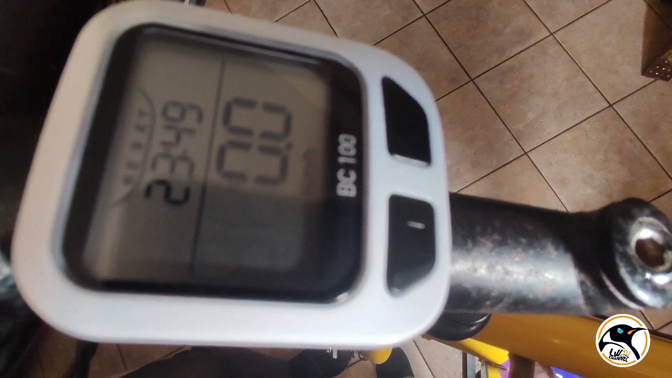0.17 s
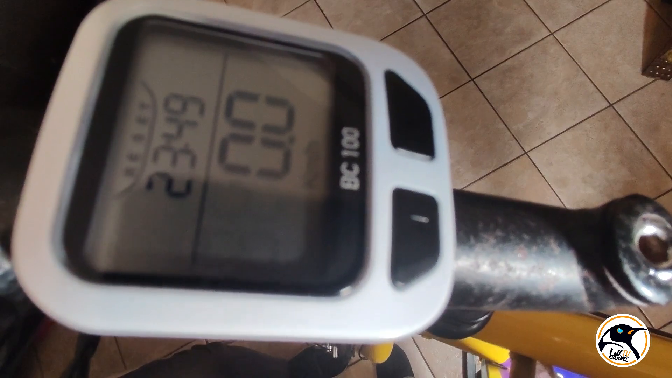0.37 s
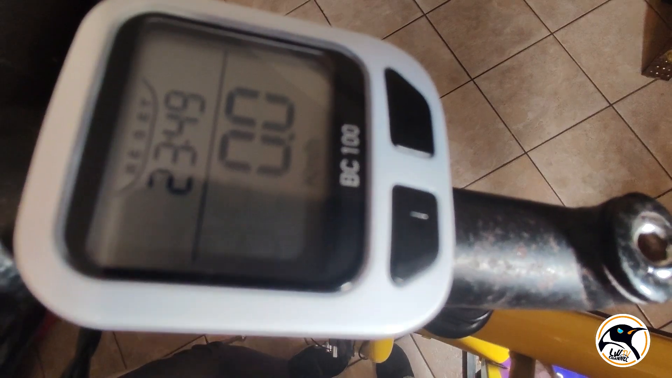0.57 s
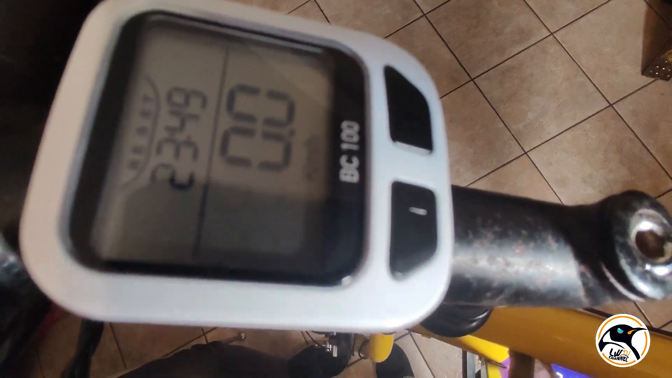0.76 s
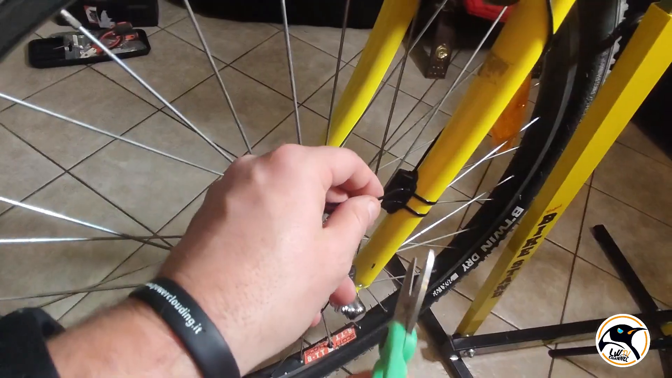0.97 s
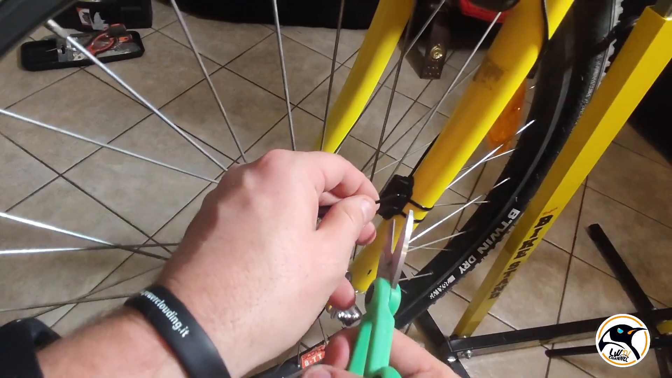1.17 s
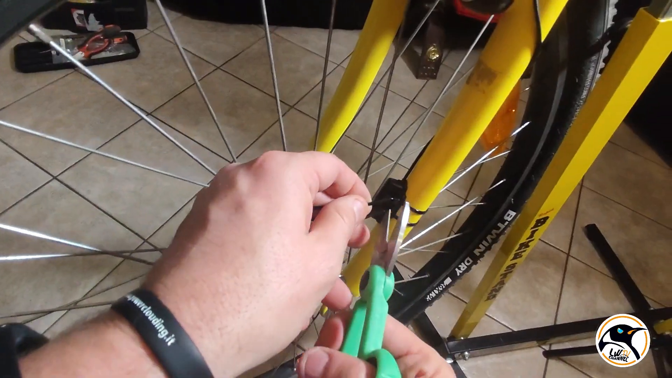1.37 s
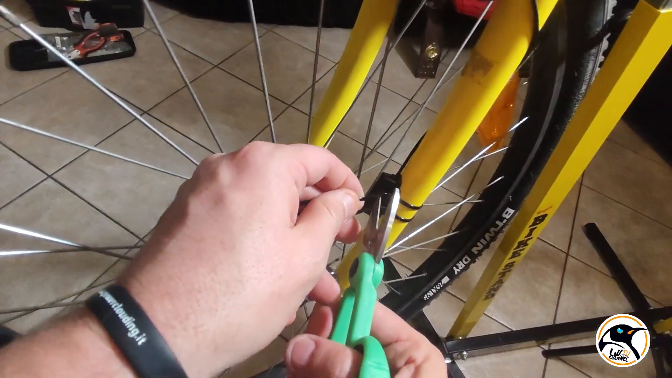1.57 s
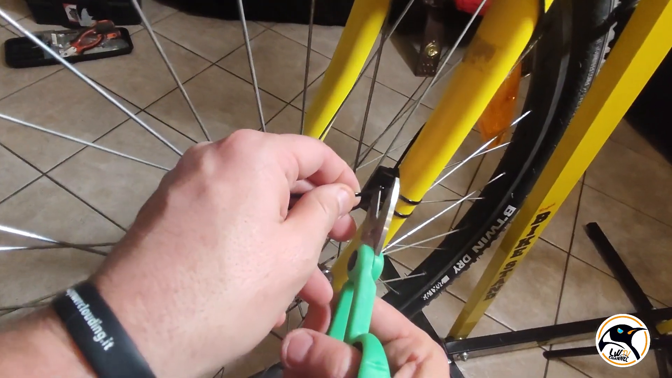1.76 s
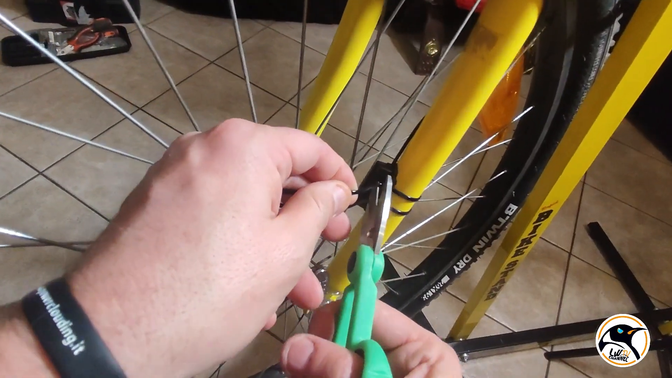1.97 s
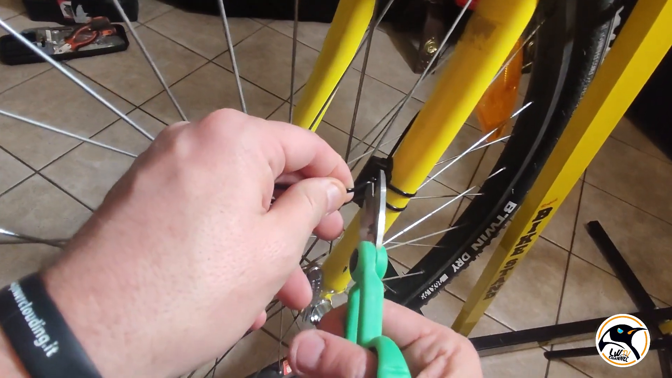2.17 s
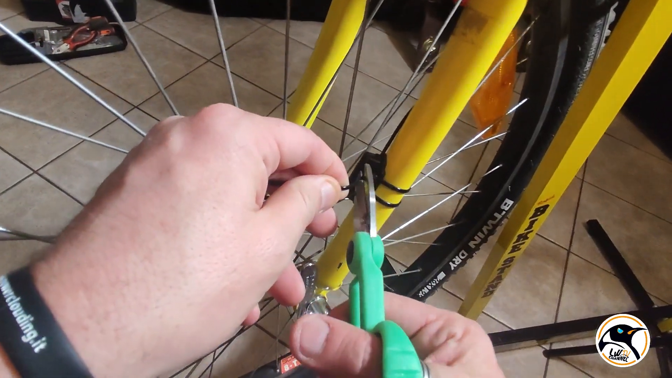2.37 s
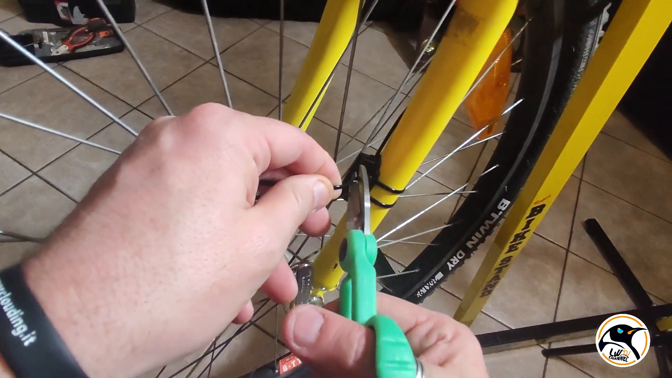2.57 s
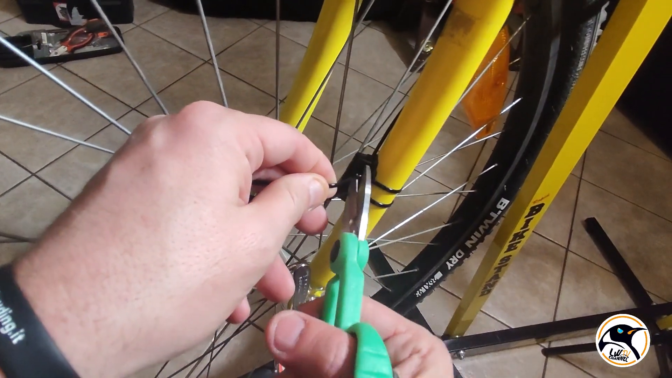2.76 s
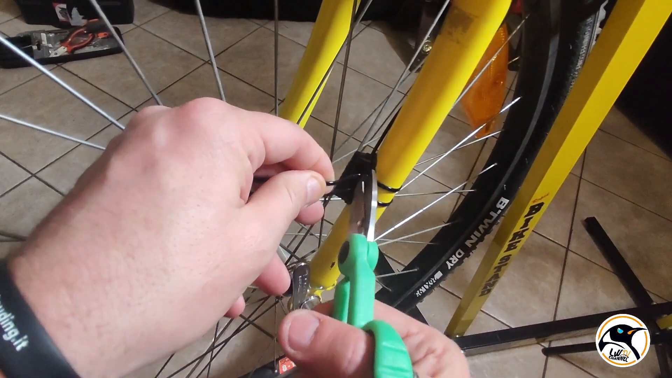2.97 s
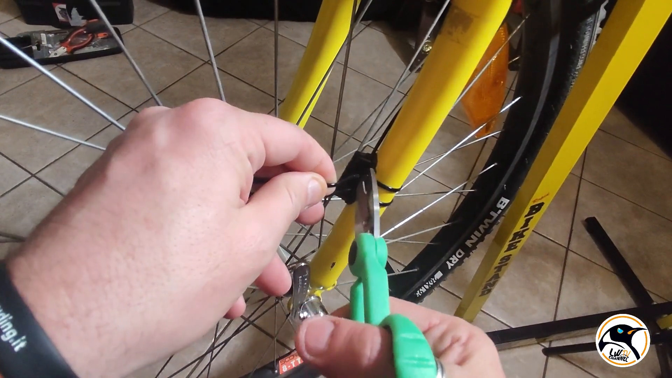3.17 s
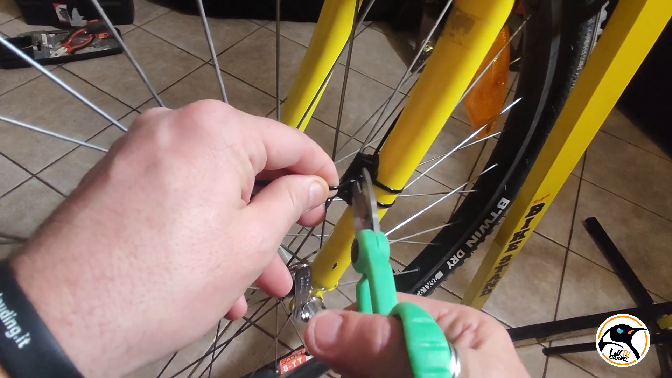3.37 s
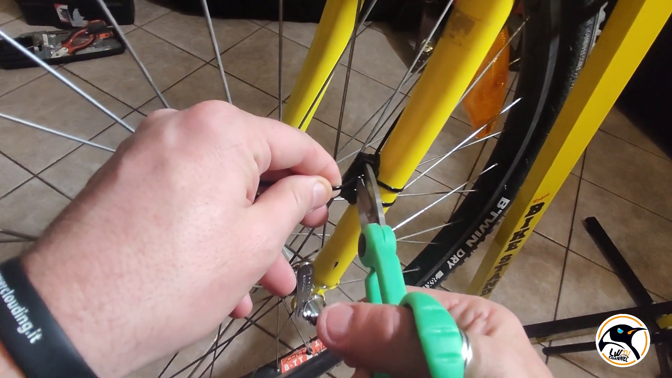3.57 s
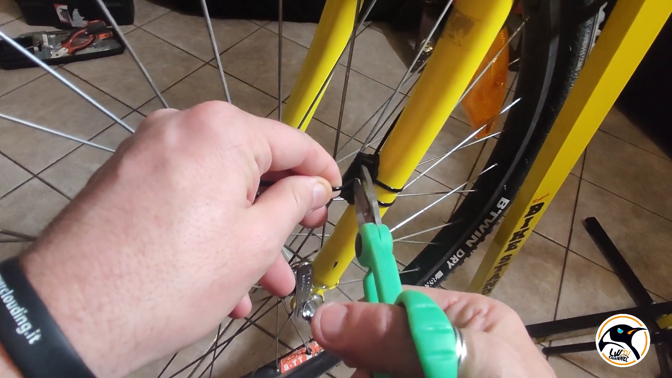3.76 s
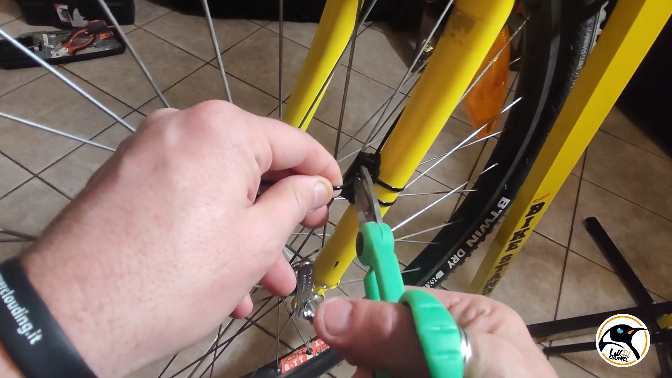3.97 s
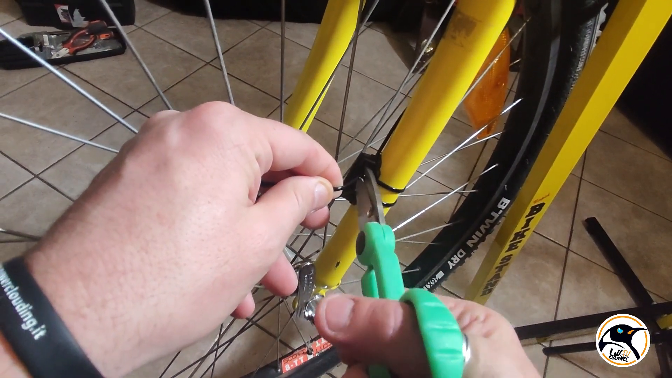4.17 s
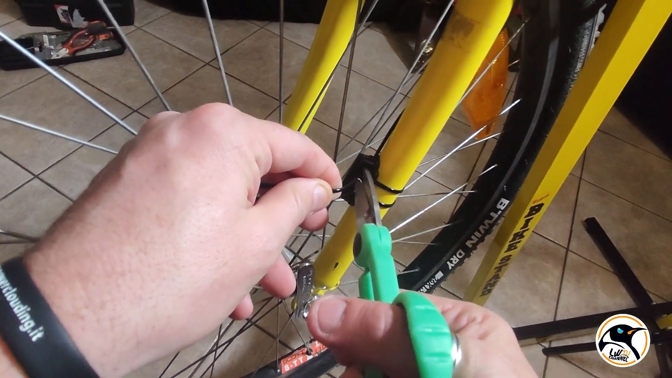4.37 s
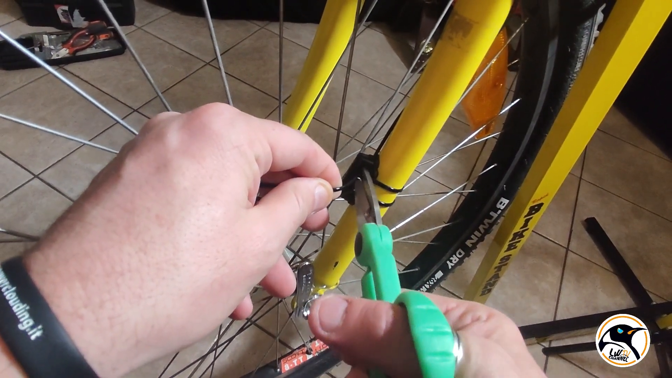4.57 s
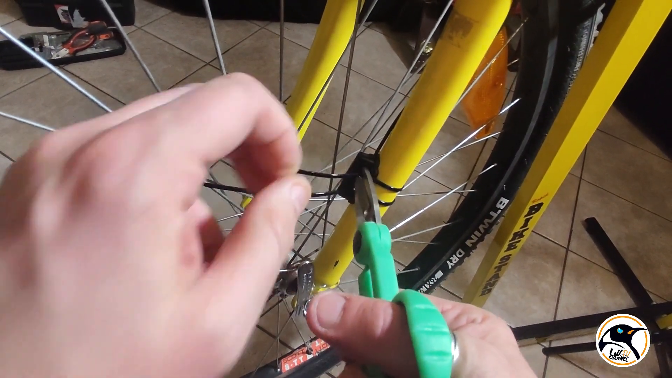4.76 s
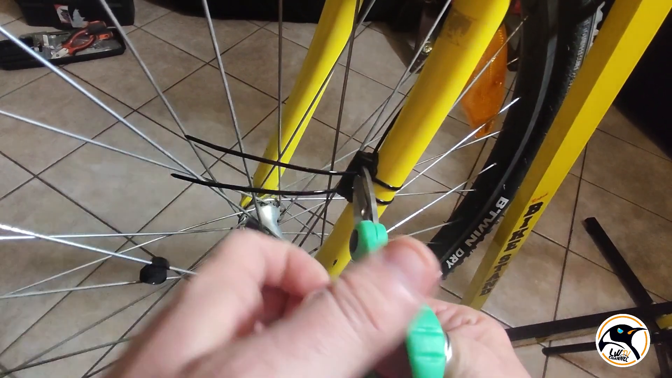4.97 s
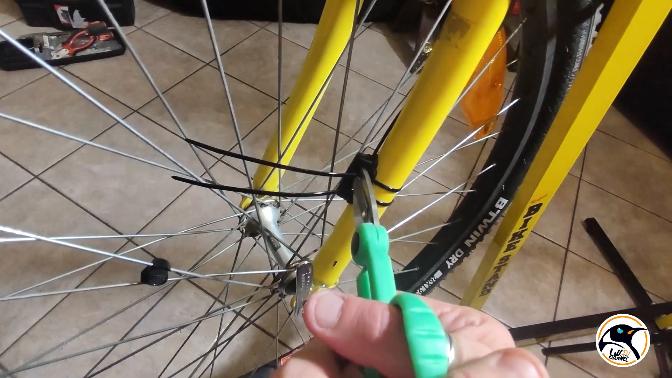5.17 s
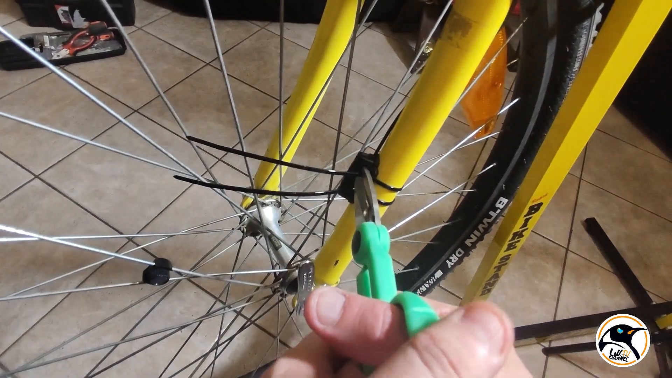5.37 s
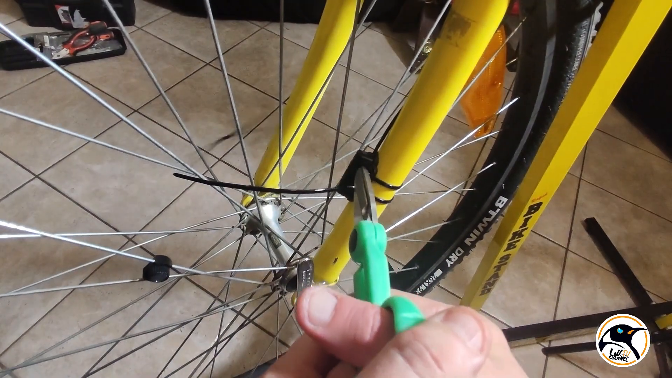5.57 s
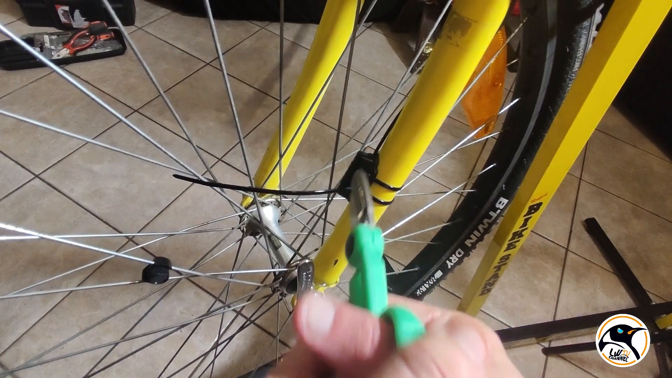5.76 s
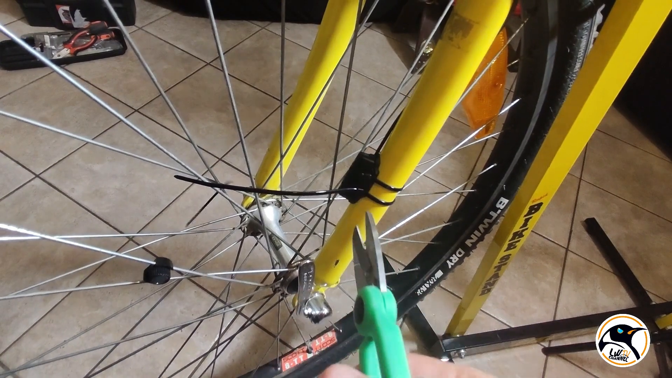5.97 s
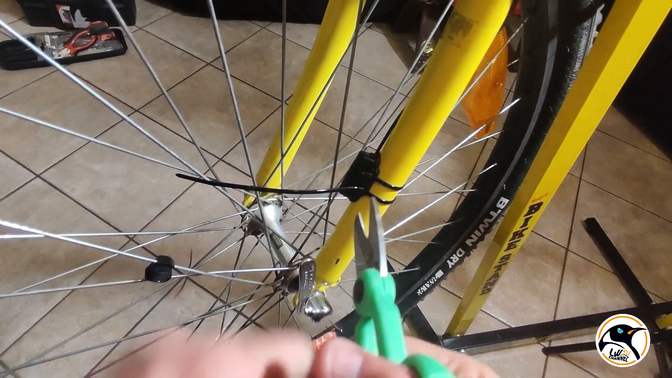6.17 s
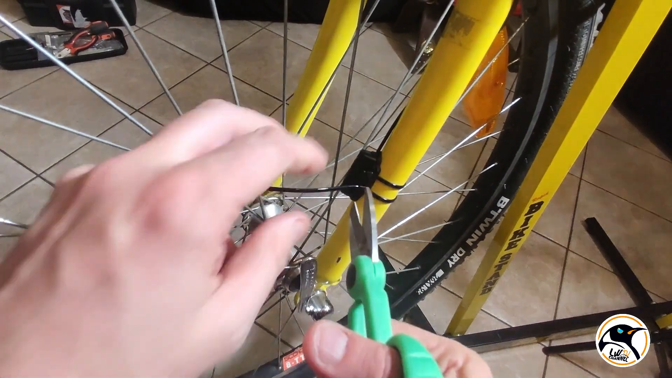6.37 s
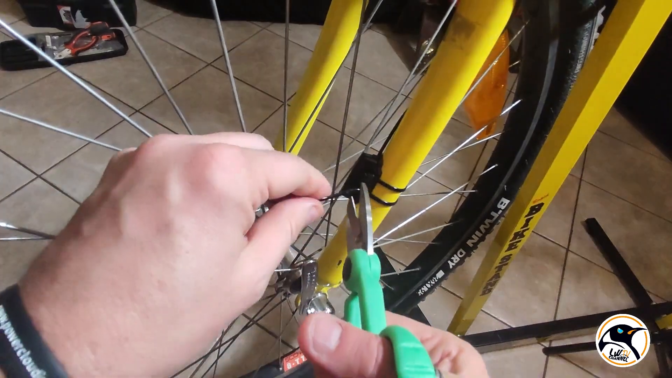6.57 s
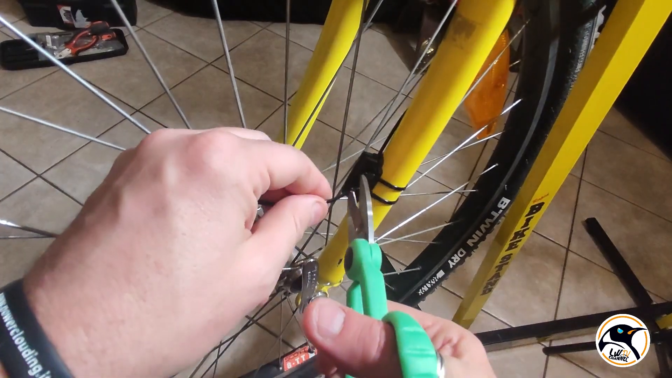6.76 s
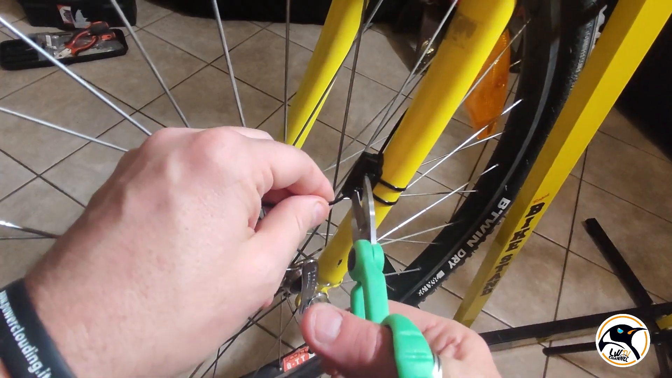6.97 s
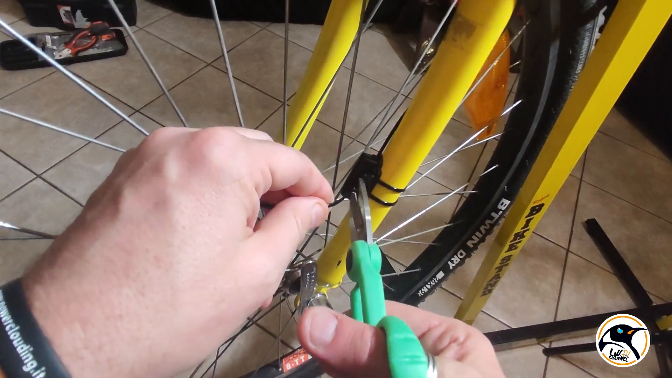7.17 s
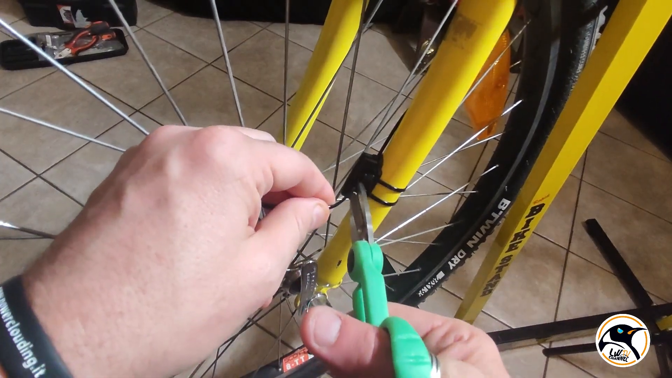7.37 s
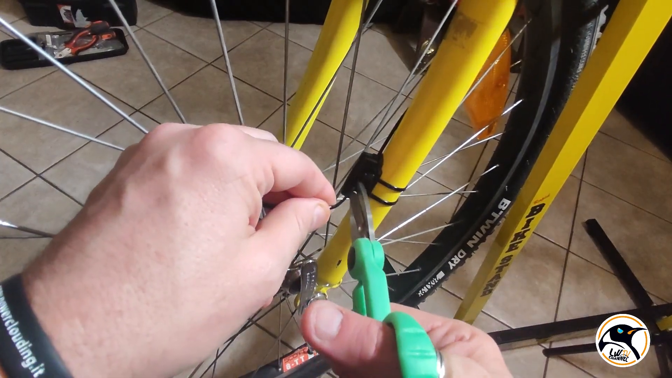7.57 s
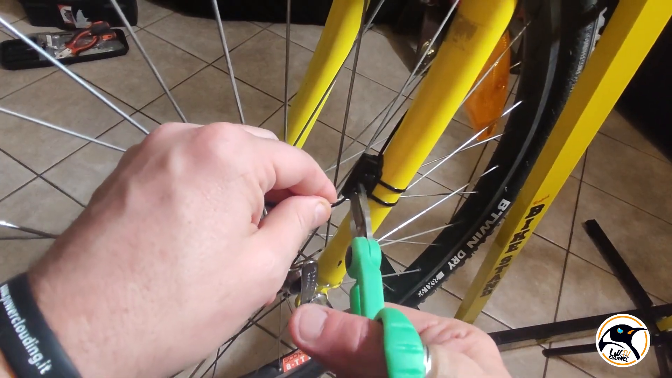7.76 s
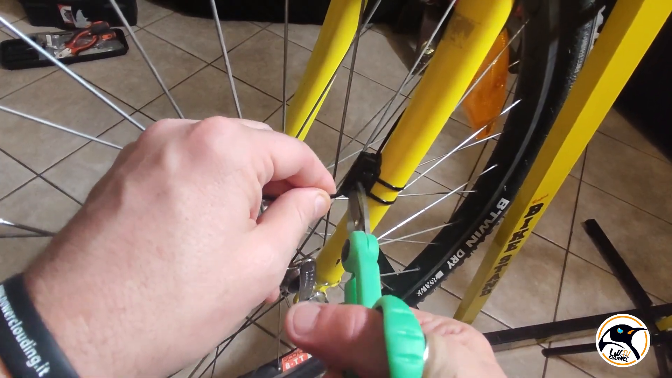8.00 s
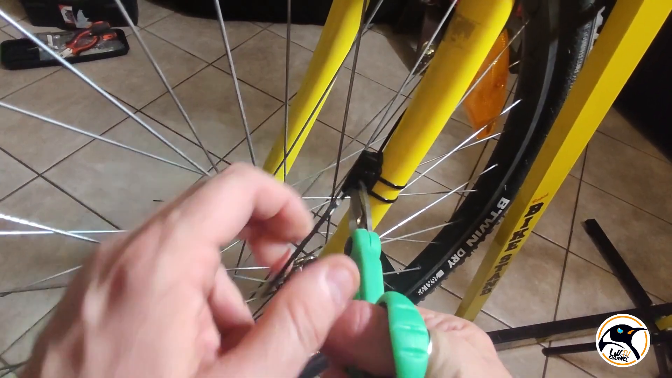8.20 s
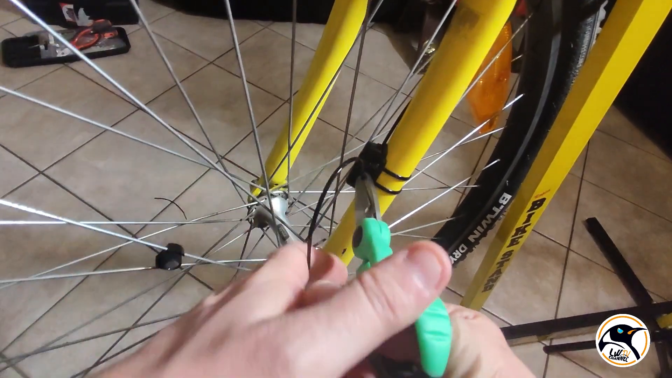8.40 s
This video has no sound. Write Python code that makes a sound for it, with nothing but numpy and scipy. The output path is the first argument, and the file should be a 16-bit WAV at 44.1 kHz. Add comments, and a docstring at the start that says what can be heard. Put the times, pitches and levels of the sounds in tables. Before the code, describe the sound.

In a small tiled room, a close handheld stereo microphone catches a dull tap and a soft hollow knock on a bicycle, quickly damped by a hand. Faint ticks, muted taps and skin rubs follow over hiss and low rumble. Late on, one very sharp plastic snap cracks out, then the cutter jaws clatter open with a thin ringing ping. Sparse ticks and slides continue to a final crisp click.

```python
"""Zip-tie tails are trimmed from a bicycle fork in a tiled room: filtered clicks, noise bursts and modes.
A dull tap, then a soft knock rings the bicycle until a hand damps it; the microphone is nudged once.
Jaws tick and tap, a faint hum swells twice, one sharp snap, and the jaws spring open ringing.
More ticks and taps follow. Sliding noise near a two-port microphone recurs throughout,
over filtered-noise hiss, handling rumble and the hum."""
import sys
import numpy as np
from scipy import signal
from scipy.fft import rfft, irfft
from scipy.io import wavfile

SR = 44100
rng = np.random.default_rng(int(sys.argv[2]) if len(sys.argv) > 2 else 0)


def persist_wave(psi):
    """Save psi, clipped to +-1, as 16-bit WAV."""
    counts = np.round(np.clip(psi, -1, 1) * 32767).astype(np.int16)
    wavfile.write(sys.argv[1], SR, np.atleast_2d(counts).T)


N = 371939
TIME = np.arange(N) / SR


def from_db(db):
    """Decibels to gain."""
    return 10 ** (np.asarray(db) / 20)


def rms_one(x):
    """Scale to rms 1."""
    return x / np.sqrt(np.mean(x ** 2) + 1e-20)


def at_hz(points, hz):
    """Interpolate a table on a log-frequency axis."""
    points = np.array(points)
    return np.interp(np.log(np.maximum(hz, 1)), np.log(points[:, 0]), points[:, 1])


def response(spectrum, size=8192):
    """Causal minimum-phase impulse response of a spectrum, by folding its cepstrum."""
    bin_hz = np.arange(size // 2 + 1) * SR / size
    cepstrum = irfft(np.log(from_db(at_hz(spectrum, bin_hz))))
    cepstrum[1:size // 2] *= 2
    cepstrum[size // 2 + 1:] = 0
    return irfft(np.exp(rfft(cepstrum)))


def colour(x, spectrum):
    """Filter by a spectrum; white noise keeps its power."""
    h = response(spectrum)
    unit_energy = h[None] / np.linalg.norm(h)
    return signal.oaconvolve(np.atleast_2d(x), unit_energy, axes=1)[:, :N]


def soften(x, top_hz):
    """A softer contact carries less above top_hz: fourth-order lowpass."""
    lowpass = signal.butter(4, min(top_hz, .45 * SR), fs=SR, output="sos")
    return signal.sosfilt(lowpass, np.asarray(x) + 1e-18)


def clicks(rows):
    """One impulse for each row (time [s], level [dB])."""
    out = np.zeros(N)
    for s, db in rows:
        out[round(s * SR)] += from_db(db)
    return out


def burst(s, dying_s):
    """A contact: micro-slips of random sign start at once and decay by 1/e in dying_s."""
    out, age = np.zeros(N), TIME[:SR // 2]
    start = round(s * SR)
    fade = np.exp(-age / max(dying_s, 1e-4))
    slips = (rng.choice([-1, 1], len(age)) * fade)[:N - start]
    out[start:][:len(slips)] = slips
    return out


def ring(x, hz, t60):
    """Two-pole resonator: a unit click starts a decaying sine of height 1; t60 in seconds."""
    radius, angle = from_db(-60 / (t60 * SR)), 2 * np.pi * hz / SR
    poles = [1, -2 * radius * np.cos(angle), radius * radius]
    return signal.lfilter([0, np.sin(angle)], poles, x + 1e-18)


def swells(rows):
    """Gain over time: a bell for each (time [s], level [dB], half length to 1/e power [s])."""
    power = 0
    for s, db, half_s in rows:
        power = power + from_db(db) ** 2 * np.exp(-np.minimum(((TIME - s) / half_s) ** 2, 50))
    return np.sqrt(power)


def friction(strokes, spectrum, grain_db):
    """Each stroke is a swell of tiny slips, uneven in size from one 32-sample grain to the next."""
    grains = np.repeat(rng.standard_normal(N // 32 + 1), 32)[:N]
    slips = rng.standard_normal(N) * from_db(grain_db * grains)
    return colour(rms_one(slips) * swells(strokes), spectrum)


def wander(per_s):
    """Slow chance of rms 1: random knots, per_s of them a second, joined by lines."""
    knots = rng.standard_normal(200)
    return rms_one(np.interp(TIME * per_s, np.arange(len(knots)), knots))


def stereo_noise(alike):
    """White noise in two channels that share the power fraction alike."""
    shared, alike = rng.standard_normal(N), np.clip(alike, 0, 1)
    return np.sqrt(alike) * shared + np.sqrt(1 - alike) * rng.standard_normal((2, N))


def place(x, pan_db, lag_s):
    """Direct sound: louder on the left by pan_db, later on the right by lag_s."""
    right = np.roll(x[0], round(lag_s * SR))
    return np.array([x[0], right]) * from_db([[pan_db / 2], [-pan_db / 2]])


def snap():
    """The nylon gives way and the jaws slam shut with a very short ping; the jolt rings the fork."""
    # the tie parts in quick cracks: (time [s], level [dB])
    crack_rows = [(5.6796, -15.5), (5.6799, 6), (5.68035, 4.5), (5.6808, -4)]
    # colour of the snap: (frequency [Hz], relative level [dB])
    snap_colour = [(100, -36.5), (300, -15.5), (720, -1.5), (1050, 1), (1400, 2.5), (2100, -14.5),
                   (2600, -3), (3200, -3), (3900, 5.5), (4500, -1), (5300, 1.5), (6500, 1.5), (8200, -1.5),
                   (10000, -1.5), (12500, -12.5), (14000, -1), (15500, -17)]
    cracks = clicks(crack_rows)
    ping = from_db(-17.0) * ring(clicks(crack_rows[1:2]), hz=8290, t60=0.0074)
    crack = colour(cracks, snap_colour) + ping
    jolt = from_db(-12) * fork(cracks)
    direct = place(crack, pan_db=-2, lag_s=0.0001)
    return direct + jolt + room(crack, near_db=-14, near_s=0.0051, far_db=-18)


def fork(blows):
    """The hand-damped fork rings briefly: a bank of decaying modes."""
    # (frequency [Hz], relative level [dB], t60 [s])
    fork_modes = [(334, -46.5, 0.13), (366, -38.5, 0.1), (696, -44, 0.11), (1260, -54, 0.043),
                  (2118, -42.5, 0.075), (2644, -42.5, 0.044)]
    return sum(from_db(db) * ring(blows, hz, t60) for hz, db, t60 in fork_modes)


def jaws():
    """Jaws and tie ends touch each other and the spokes; each contact also rings the steel."""
    # contacts: (time [s], relative level [dB], 1/e decay [s], ringing re contact [dB],
    # left-right [dB], lowpass corner [Hz])
    contacts = [(0.905, -48, .004, -15, 4, 12000), (0.953, -39, 0.00099, -28, 9, 11000),
                (1.3475, -39.5, 0.0011, -18, 5, 18000), (1.5625, -43, 0.0023, -15, -1, 13000),
                (2.812, -46, 0.0022, -11, -8, 16000), (2.887, -48, 0.0024, -9, -8, 14000),
                (3.203, -46.5, 0.001, -18, -1, 14000), (3.495, -49.5, 0.0017, -9, 8, 10000),
                (4.691, -47, 0.007, -7, 13, 10400), (4.7, -45.5, 0.011, -1, 15.5, 9050),
                (4.8205, -34, 0.0012, -9, 7, 19000), (4.830, -46, 0.0028, -12, 14, 16000),
                (5.771, -55.5, .008, 20.5, 0, 4830), (5.829, -32.5, 0.0052, -3, 1, 10800),
                (5.837, -39, 0.0058, -9, 10, 12100), (5.9257, -39, 0.0014, -5.5, -12, 18000),
                (5.950, -36.5, 0.005, -7, -1, 19000), (5.9719, -26, 0.0017, -7.5, 10, 14900),
                (5.9738, -28, 0.0029, -4.5, 7, 11100), (5.9926, -34.5, 0.008, 3, 5, 16000),
                (6.024, -39.5, 0.012, 0, -2, 11000), (6.576, -39, 0.004, -15.5, 17.5, 7450),
                (6.585, -50, 0.047, -13, 10, 8000), (6.78, -49.5, .003, -16, 1, 14100),
                (7.601, -53, 0.004, 2.5, 6, 9900), (8.3536, -40, .002, -27, 9, 14000),
                (8.359, -36.5, 0.0013, -18, -2, 14000), (8.3634, -21, 0.00066, -42, 8.5, 13500)]
    # colour of a contact: (frequency [Hz], relative level [dB])
    contact_colour = [(200, -8), (1000, -20), (2200, -9), (3500, -18), (5500, -12.5), (7200, 3.5),
                      (8200, 3), (9500, -2.5), (11000, 1.5), (12500, 1), (15000, -6)]
    # steel modes: (frequency [Hz], relative level [dB], t60 [s])
    steel_modes = [(1663, -22, .2), (1810, -19, .25), (2234, -15, .4), (2584, -14, .35), (2683, -14, .6),
                   (3030, -20, .2), (4005, -21, .16), (4180, -25, .3), (4526, -20, .3), (4730, -22, .25),
                   (5706, -16, .15), (6659, -13, .13), (7190, -10, .13), (8110, -3, .06), (8300, -17, .15),
                   (9075, -11, .12), (9561, -7, .12)]
    # crowded short modes of spokes and cutters merged: (frequency [Hz], relative level [dB])
    shimmer_colour = [(400, -3), (1300, -30), (1750, 1.5), (2300, 4.5), (2700, -3), (3200, -8.5),
                      (4000, -10), (4700, 0), (6000, 4.5), (8000, -30), (10700, -34.5), (12500, -2)]
    contact, direct, shimmer, blows = 0, 0, 0, []
    for s, db, dying_s, ringing_db, pan_db, top_hz in contacts:
        slips = from_db(db) * soften(burst(s, dying_s), top_hz)
        contact = contact + slips
        direct = direct + place([slips], pan_db, lag_s=.00011)
        port_bursts = [burst(s, dying_s=0.043) for port in range(2)]
        shimmer = shimmer + from_db(db + ringing_db) * soften(port_bursts, top_hz)
        blows.append((s, db + ringing_db, top_hz))
    when_s, strength_db, tops_hz = np.transpose(blows)
    steel = 0
    for hz, db, t60 in steel_modes:
        softness_db = 10 * np.log10(1 + (hz / tops_hz) ** 8)
        chance_db = 1.6 * rng.standard_normal(len(when_s))  # each mode's strength varies per contact
        mode_db = strength_db + db - softness_db + chance_db
        steel = steel + ring(clicks(zip(when_s, mode_db)), hz, t60)
    metal = from_db(-12) * place([steel], pan_db=-3.0, lag_s=0.00022)
    metal = metal + from_db(-12.0) * colour(shimmer, shimmer_colour)
    to_room = colour(contact, contact_colour) + from_db(-2) * steel
    reflected = room(to_room, near_db=-8, near_s=0.0038, far_db=-12.5)
    return colour(direct, contact_colour) + metal + reflected


def spring():
    """The cutters' return spring, jolted as the jaws fly open, pings high and briefly."""
    # (time [s], level [dB])
    jolts = [(5.9715, -44), (5.9935, -33.5)]
    # (frequency [Hz], relative level [dB], t60 [s])
    spring_modes = [(10690, -1, 0.11), (10800, -3, .06), (10980, -3, .06)]
    ping = sum(from_db(db) * ring(clicks(jolts), hz, t60) for hz, db, t60 in spring_modes)
    direct = place([ping], pan_db=4, lag_s=.0001)
    return direct + room(ping, near_db=-10, near_s=.004, far_db=-9)


def taps():
    """Small nudges on the bicycle: short dull pulses, softer or harder, ring the fork to varying degrees."""
    # (time [s], relative level [dB], share reaching fork and room [dB], lowpass corner [Hz])
    nudges = [(0.6598, -30, -29, 12000), (1.625, -46, 0, 1900), (1.802, -38.5, 0, 6000),
              (2.811, -43.5, 3.5, 2200), (2.888, -43.5, 1.5, 2100), (2.937, -50.5, 8, 1900),
              (3.04, -44.5, 2.5, 1500), (3.203, -41, -1, 1700), (3.377, -50, 5, 1500),
              (3.495, -40.5, 3, 6000), (4.824, -53.5, 5, 6000), (6.937, -41.5, 1, 1800),
              (7.172, -46, 1.5, 1500), (8.365, -48, -3, 6000)]
    # colour of a tap: (frequency [Hz], relative level [dB])
    tap_colour = [(120, -7), (350, 10.5), (500, 3), (690, -0.5), (950, -0.5), (1400, -2), (2200, 4.5),
                  (3000, -8.5), (5000, -20.5), (12000, -18)]
    direct, blows = 0, 0
    for s, db, share_db, top_hz in nudges:
        pulse = soften(clicks([(s, db)]), top_hz)
        direct = direct + pulse
        blows = blows + from_db(share_db) * pulse
    near = place(colour(direct, tap_colour), pan_db=-1.5, lag_s=0.00018)
    spread = room(colour(blows, tap_colour), near_db=-4.5, near_s=0.0061, far_db=-4.0)
    return from_db(10) * (near + spread + from_db(11.5) * fork(blows))


def knock():
    """A soft blow rings the bicycle until a hand damps it; the tyre scuffs as the bicycle shifts."""
    # (time [s], relative level [dB])
    blow_rows = [(0.8338, -38), (0.8358, -36)]
    # colour of knock and scuff: (frequency [Hz], relative level [dB])
    knock_colour = [(80, -7), (200, 16), (400, 2.5), (620, -1.5), (950, -6.5), (1700, -9), (3100, -11.5),
                    (5000, -23), (8500, -11.5), (14000, -15.5)]
    # (frequency [Hz], relative level [dB], t60 [s])
    bicycle_modes = [(204.4, -8.5, 3.1), (282, -31, 0.26), (387, -22, 0.32), (410, -22, 0.87),
                     (581, -12, 0.18), (613, -17.5, 0.2), (795, -25, 0.62), (1570, -31, 0.22),
                     (1730, -30.5, 0.32)]
    # (time [s], relative level [dB], half length [s])
    scuff_rows = [(.865, -52, 0.018), (.94, -51.5, 0.037)]
    bursts = sum(from_db(db) * burst(s, dying_s=0.0089) for s, db in blow_rows)
    blow = colour(bursts, knock_colour)
    first_blow = clicks(blow_rows[:1])
    body = sum(from_db(db) * ring(first_blow, hz, t60) for hz, db, t60 in bicycle_modes)
    body = body * hand_damping()
    scuff = friction(scuff_rows, knock_colour, grain_db=6.0)
    direct = place(blow + body + scuff, pan_db=4.0, lag_s=.0001)
    return direct + room(blow + scuff, near_db=-2.5, near_s=0.0049, far_db=-2.5)


def hand_damping():
    """Ring gain: steady until the hand lands, then an extra fall at a steady dB rate to a floor."""
    hand_s, free_ring_db = 0.938, 9.5
    damping_db_per_s, damping_depth_db = 170, 19.5
    loss_db = np.clip(damping_db_per_s * (TIME - hand_s), 0, damping_depth_db)
    return from_db(free_ring_db - loss_db)


def fingers():
    """Skin and nylon slide close to the left port; hands and sleeves shift with a muffled rustle."""
    # fingers and tie slide: (time [s], relative level [dB], half length [s])
    rub_rows = [(.944, -48, 0.029), (.99, -59, 0.06), (1.25, -65, 0.44), (1.40, -54.5, 0.0071),
                (2.13, -64.5, .03), (2.40, -62, 0.033), (2.94, -53, 0.01), (4.745, -52, 0.015),
                (4.77, -48.5, 0.0074), (4.797, -58, 0.0084), (5.06, -61, 0.17), (5.78, -50, 0.027),
                (6.205, -52, 0.018), (6.303, -43.5, 0.016), (6.33, -54.5, 0.024), (6.61, -55, 0.013),
                (6.67, -54, 0.016), (6.81, -59.5, 0.026), (8.19, -58, 0.03), (8.30, -55, 0.03),
                (8.39, -58, 0.045)]
    # colour of sliding skin: (frequency [Hz], relative level [dB])
    rub_colour = [(200, -29), (1200, -10), (2500, -11), (4000, -12.5), (6500, 0), (8400, 4.5), (10000, 2),
                  (12000, 0), (15000, -1)]
    # ribbed tie rasps along a blade: (time [s], relative level [dB], half length [s])
    rasp_rows = [(.09, -57.5, 0.018), (1.59, -63, 0.02), (2.42, -70.5, 0.042), (2.60, -63.5, 0.029),
                 (3.60, -69, 0.034), (4.60, -65.5, 0.023), (4.78, -56, 0.0096), (5.46, -61.5, 0.008),
                 (5.660, -52, 0.012), (6.61, -58.5, 0.017), (7.17, -70, 0.023), (7.635, -67.5, 0.028)]
    # colour of the rasp: (frequency [Hz], relative level [dB])
    rasp_colour = [(300, -30), (1500, -10), (2100, -9.5), (2600, 7.5), (3300, -4.5), (4200, -2), (5200, -3),
                   (6300, 2), (8000, 1), (10000, -7), (14000, -15)]
    # hands and sleeves against the bicycle: (time [s], relative level [dB], half length [s])
    shift_rows = [(1.09, -63, 0.027), (1.25, -66.5, 0.19), (2.2, -66.5, 0.12), (2.9, -66, 0.11),
                  (3.42, -65, 0.092), (7.45, -61.5, 0.089), (7.8, -72, 0.14)]
    # colour of the rustle: (frequency [Hz], relative level [dB])
    shift_colour = [(30, -4), (90, 1), (250, 0.5), (400, -9), (700, -21), (1500, -29), (4000, -37)]
    rub = friction(rub_rows, rub_colour, grain_db=1.5)
    rub = rub + friction(rasp_rows, rasp_colour, grain_db=2.5)
    shift = friction(shift_rows, shift_colour, grain_db=0)
    direct = place(rub, pan_db=5.5, lag_s=.0001)
    sliding = from_db(-5.5) * (direct + room(rub, near_db=3, near_s=0.0029, far_db=-3.5))
    return sliding + room(shift, near_db=3, near_s=0.0043, far_db=-4)


def room(x, near_db, near_s, far_db):
    """Quick reflections from hands and frame, then the tiled room as noise dying band by band."""
    # (frequency [Hz], t60 [s])
    room_t60 = [(150, 0.63), (700, 0.7), (2500, 0.39), (4500, 0.43), (8000, 0.33), (14000, 0.31)]
    age, tail = TIME[:SR * 3 // 5], 0
    edges_hz = np.geomspace(90, 17000, 11)
    white = rng.standard_normal((2, 2, len(age)))
    for k, band in enumerate(zip(edges_hz, edges_hz[1:])):
        bandpass = signal.butter(2, band, "band", fs=SR, output="sos")
        noise = signal.sosfilt(bandpass, white[k % 2])  # neighbouring bands use different noise
        t60_s = at_hz(room_t60, np.sqrt(np.prod(band)))
        tail = tail + noise * from_db(-60 * age / t60_s)
    near = rng.standard_normal((2, len(age))) * np.exp(-age / near_s) * (age > .001)
    echoes = from_db(near_db) * rms_one(near) + from_db(far_db) * rms_one(tail * (age > .006))
    return signal.oaconvolve(np.atleast_2d(x), echoes / np.sqrt(len(age)), axes=1)[:, :N]


def handling():
    """The hand-held microphone rumbles all the time; one nudge is a single slow push of air."""
    # colour of the rumble: (frequency [Hz], relative level [dB])
    rumble_colour = [(10, 4.5), (25, -0.5), (50, -6.5), (100, -14.5), (200, -26), (500, -55)]
    level_db = -54.5 + 1.5 * wander(per_s=3.05)  # ahead of the port gains
    rumble = from_db(level_db) * colour(stereo_noise(alike=0.23), rumble_colour)
    nudge = swells([(1.1, -38, 0.0033)])
    return (rumble + nudge) * from_db([[3.5], [.5]])  # left, right [dB]


def hiss():
    """Steady coloured noise, nearly independent in the two ports."""
    # (frequency [Hz], relative density [dB])
    hiss_colour = [(59, -18), (100, 0.5), (134, -4.5), (165, -3), (227, -5), (359, -7.5), (582, -12.5),
                   (688, -13.5), (780, -15.5), (2090, -19.5), (5720, -25), (8000, -35.5), (9860, -24),
                   (13800, -24.5), (15000, -62)]
    noise = colour(stereo_noise(alike=0.083), hiss_colour)
    return from_db(-61) * noise * from_db([[.3], [-.7]])  # left, right [dB]


def port_hiss():
    """White noise through the left port's resonance, much fainter on the right."""
    resonance = rms_one(ring(rng.standard_normal(N), hz=7920, t60=0.0023))
    return from_db(-68) * resonance * from_db([[3], [-16]])  # left, right [dB]


def hum():
    """A faint hum, noise through two equal resonators, wavers in pitch and swells twice."""
    # (time [s], level [dB], half length [s])
    hum_swells = [(2.38, -59.5, 0.36), (3.58, -62, 0.15)]
    hum_hz, rest_db = 167.4, -72
    drone = ring(rng.standard_normal(N), hum_hz, t60=0.14)
    drone = rms_one(ring(drone, hum_hz, t60=0.14))
    envelope = np.abs(signal.hilbert(drone))
    evened = rms_one(drone / (1.2 + envelope))  # pitch wanders, level varies less
    return np.hypot(from_db(rest_db), swells(hum_swells)) * evened


def background():
    """Hiss, the left port's resonance in it, handling rumble and hum."""
    return hiss() + port_hiss() + handling() + hum()


def scene():
    """All the work is heard through two ports that resonate differently; the background is added."""
    # (frequency [Hz], left [dB], right [dB])
    port_colours = np.array([(99, -5, -3.5), (710, 2.5, 1.5), (1400, 1, 5), (2770, 3, 6.5),
                             (3360, 7.5, 8.5), (4620, 2.5, 2), (5400, 2, -7), (7270, 1.5, -14.5),
                             (7950, 12.5, -8.5), (9020, 3.5, 5.5), (10150, -3, -0.5), (14100, -6.5, -12.5)])
    work = snap() + jaws() + spring() + taps() + knock() + fingers()
    heard = []
    for c in range(2):
        port_response = response(port_colours[:, [0, c + 1]])
        heard.append(signal.oaconvolve(work[c], port_response)[:N])
    return np.array(heard) + background()


def record(dry):
    """The highest peaks are rounded by tanh; a steep lowpass cuts the top."""
    cutoff_hz = 14600
    lowpass = signal.ellip(10, .1, 80, cutoff_hz, fs=SR, output="sos")
    return signal.sosfilt(lowpass, np.tanh(dry))


dry = scene()
out = record(dry)
persist_wave(out)
```